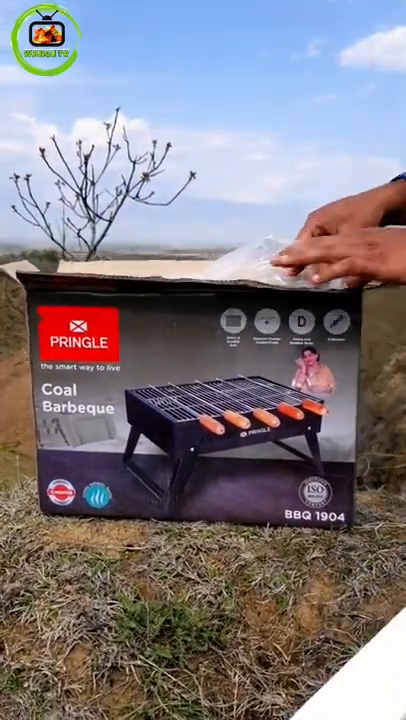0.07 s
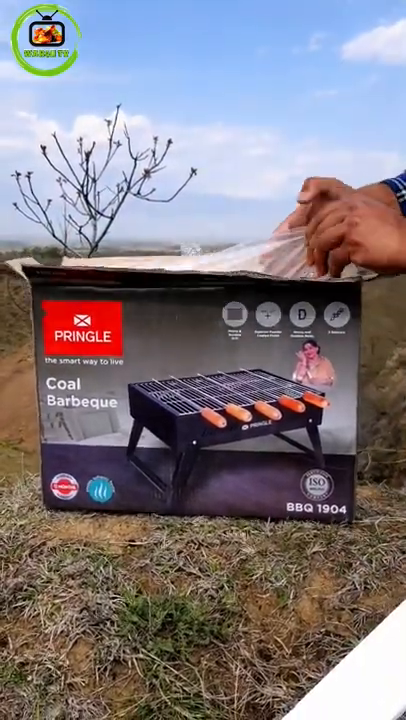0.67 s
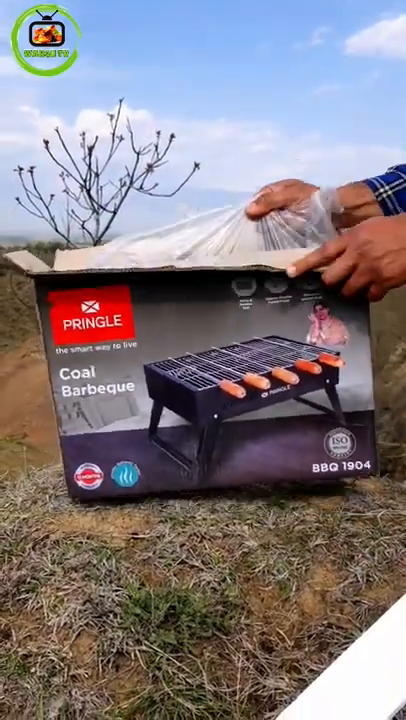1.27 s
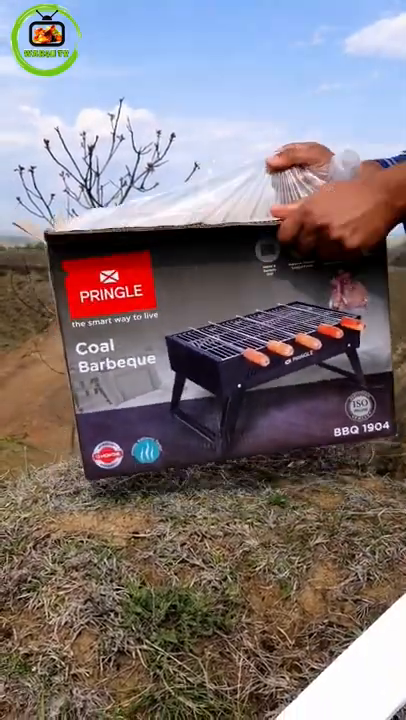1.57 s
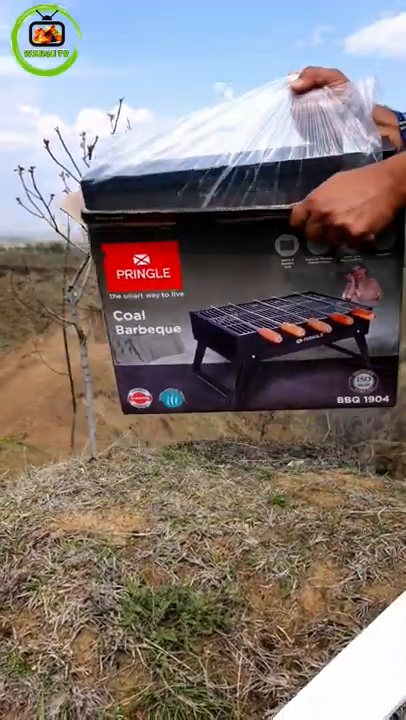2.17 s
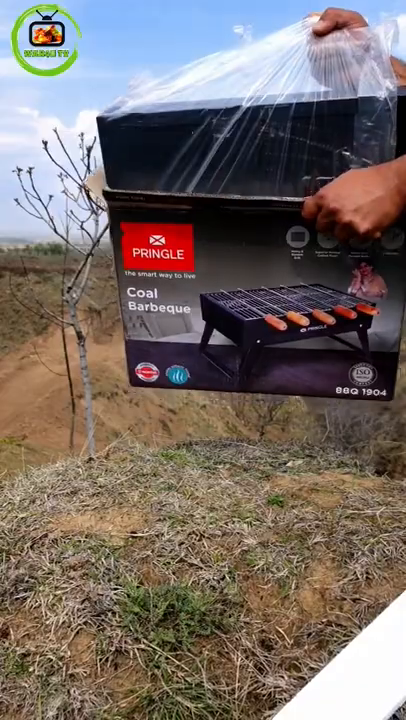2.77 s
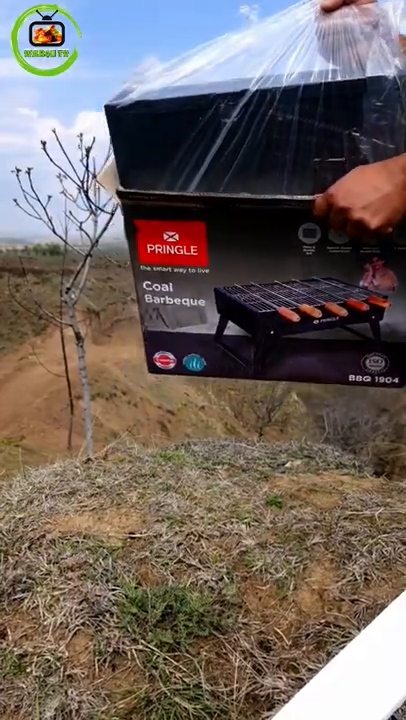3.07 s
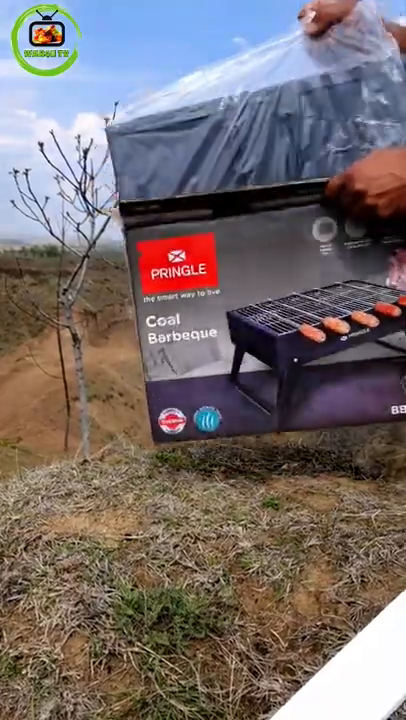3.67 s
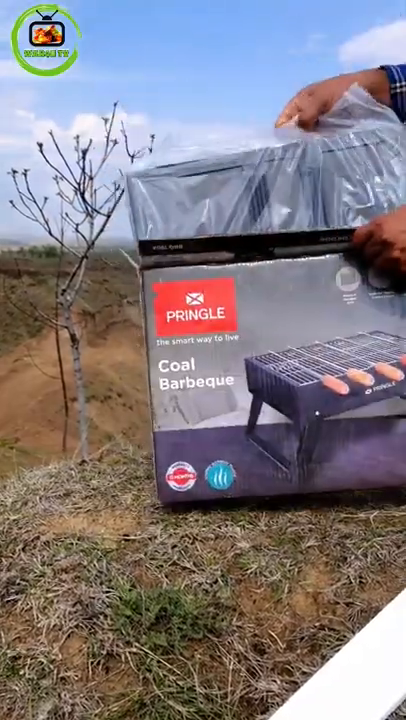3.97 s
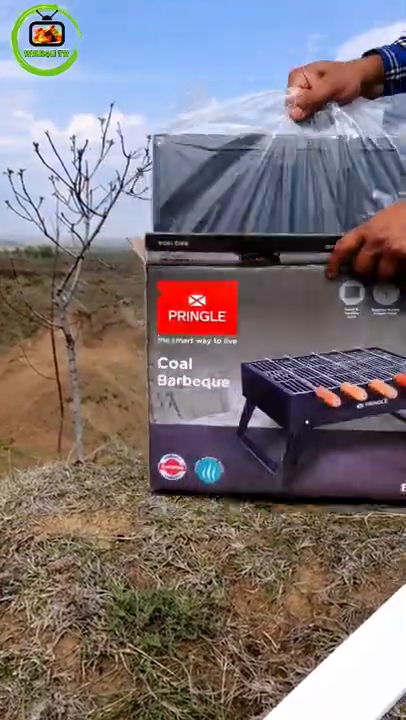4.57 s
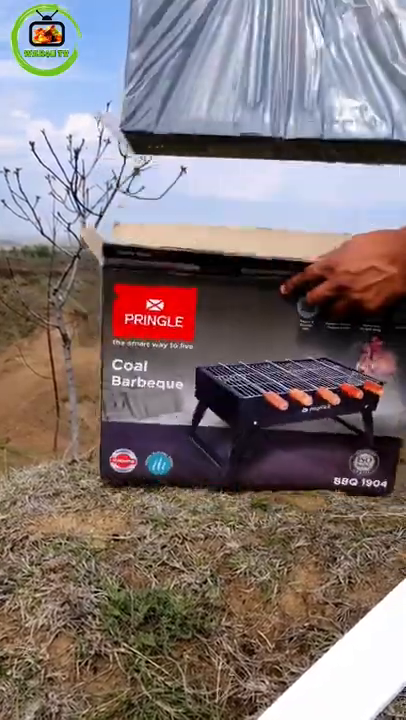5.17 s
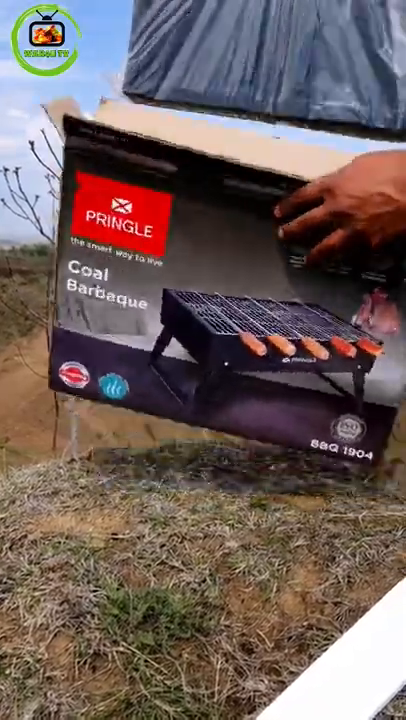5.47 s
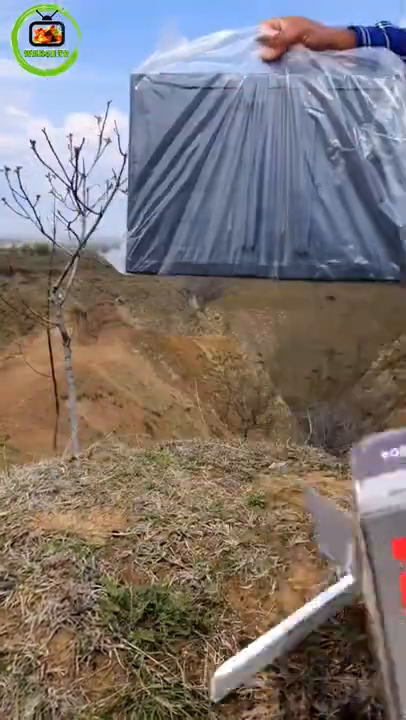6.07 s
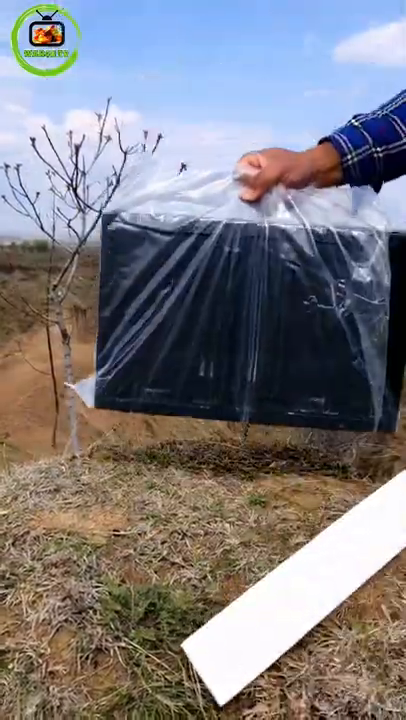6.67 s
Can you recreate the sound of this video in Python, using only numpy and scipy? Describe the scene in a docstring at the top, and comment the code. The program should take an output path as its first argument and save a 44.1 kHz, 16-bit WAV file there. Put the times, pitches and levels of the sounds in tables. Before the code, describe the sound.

From the start, thin plastic wrap crinkles and snaps close by, slightly left, while a folded grill rasps against its cardboard box in uneven tugs. A sharp snap comes at 0.8 seconds and a dull knock at 1.1. Light wind buffets the microphone in low puffs, mostly on the right, until about 1.6 seconds. The scraping and rustling continue, fading to faint hiss and ticks around 3 to 3.6 seconds. At 4 seconds the box thumps and wind rumbles on the left. Louder crinkling and hollow scraping follow, peaking near 4.6, with a heavy knock and deep thumps from 5 to 5.4 as the grill comes free. After a quieter rustle, the empty box hits the ground with two loud hollow thuds at about 6.4 and 6.5 seconds, then smaller knocks, scraping and crinkling fade. The open air behind is very faint, with no echo.

```python
"""Unboxing a grill outdoors

A folded grill in thin plastic wrap is tugged out of its cardboard box. The film crinkles and snaps
as its creases buckle, the load scrapes and knocks along the walls, and the empty box is dropped on
dry ground. A light wind buffets the microphone's two openings (ports), mostly one at a time."""
import sys
import numpy as np
from scipy import signal
from scipy.fft import rfft, irfft
from scipy.io import wavfile
from scipy.ndimage import uniform_filter1d

SR = 44100
rng = np.random.default_rng(int(sys.argv[2]) if len(sys.argv) > 2 else 0)


def pcm_store(signal):
    """Save signal as 16-bit PCM."""
    levels = np.round(np.clip(np.atleast_2d(signal), -1, 1) * 32767)
    wavfile.write(sys.argv[1], SR, levels.astype(np.int16).T)


N = 305613
TIME = np.arange(N) / SR

# The deep tone of both the wind and the shuddering box. Each row: frequency in Hz, level in dB.
BASS_SPECTRUM = [(15, -83), (28, -6), (38, -7), (55, 5.5), (72, 6.5), (100, -0.5), (150, -8.5),
                 (250, -23.5), (400, -31), (700, -57)]
# How the walls ring with the grill inside. Each row: pitch in Hz, width in Hz, level in dB.
LOADED_WALL_MODES = [(217, 100, -7), (319.2, 40, 0.5), (405, 140, -3.5), (523, 90, 0.5), (597, 38, -5.5)]


def from_db(db):
    """Turn decibels into a number to multiply a sound by."""
    return 10 ** (np.asarray(db) / 20)


def rms_one(x):
    """Scale a sound so that its average level (rms) is 1."""
    return x / np.sqrt(np.mean(x ** 2) + 1e-20)


def in_time(rows):
    """Draw straight lines between timed rows, giving each column a value at every sample."""
    times, *columns = np.transpose(rows)
    return [np.interp(TIME, times, column) for column in columns]


def panned(pan_db):
    """Left and right gains that average 1; a positive pan_db leans left."""
    ratio = from_db(np.atleast_1d(pan_db))
    return 2 * np.array([ratio, np.ones_like(ratio)]) / (1 + ratio)


def from_left(x, delay=8):
    """Sound from the box reaches the right port a few samples late."""
    return np.array([x[0], np.pad(x[1], (delay, 0))[:N]])


def add(out, start_s, sound):
    """Mix a short sound into the stereo track."""
    at = int(np.clip(start_s * SR, 0, N - 1))
    out[:, at:at + sound.shape[-1]] += sound[..., :N - at]


def band(x, low_hz, high_hz):
    """Keep what lies between two frequencies and gently fade the rest."""
    edges_hz = [low_hz, min(high_hz, SR / 2 - 100)]
    return signal.sosfilt(signal.butter(2, edges_hz, "band", fs=SR, output="sos"), x)


def coloured(x, spectrum, size=8192):
    """Give a sound the tone of a spectrum; white noise keeps its power."""
    hz, db = np.transpose(spectrum)
    grid_hz = np.maximum(np.arange(size // 2 + 1) * SR / size, 1)
    gains = from_db(np.interp(np.log(grid_hz), np.log(hz), db))
    # a minimum-phase filter: nothing rings ahead of a click
    cepstrum = irfft(np.log(gains))
    response = irfft(np.exp(2 * rfft(cepstrum[:size // 2], size)))[:size // 2]
    return signal.oaconvolve(x, response[None] / np.linalg.norm(response))[:, :N]


def resonant(x, modes):
    """Make a sound ring at several pitches (modes), each at its own level."""
    out = 0
    for k, (hz, width_hz, db) in enumerate(modes):
        r = np.exp(-np.pi * width_hz / SR)
        mode = signal.lfilter([1, 0, -1], [1, -2 * r * np.cos(2 * np.pi * hz / SR), r * r], x)
        out = out + (-1) ** k * from_db(db) * rms_one(mode)
    return out


def drift(per_s):
    """A curve that wanders around 0, reaching a new random value per_s times a second."""
    points = rng.standard_normal(N // 10)
    return np.interp(TIME * per_s, np.arange(len(points)), points)


def stereo_noise(alike, size):
    """White noise whose two sides are unrelated (alike = 0) or nearly the same (close to 1)."""
    mid, side = rng.standard_normal((2, size))
    return np.sqrt(1 + alike) * mid + np.sqrt(1 - alike) * side * np.array([[1], [-1]])


def evened(x, window_s):
    """Hold the slow level at 1 and keep the fine grain."""
    width = max(int(window_s * SR), 2)
    power = uniform_filter1d(uniform_filter1d(x.mean(axis=0) ** 2, width), width)
    return x / np.sqrt(np.abs(power) + 1e-12)


def crackle(per_s, spread_db, ring_s, alike, low_hz, high_hz, count=48, size=512):
    """Random clicks of unequal strength, each on one of many small patches with its own pitch."""
    strengths = from_db(spread_db * np.minimum(rng.exponential(1, N), 4.5)) * rng.choice([-1, 1], N)
    patch_at = rng.integers(0, count, N)
    patches = []
    for hz in np.linspace(low_hz, high_hz, count):
        tick = stereo_noise(alike, size) * np.exp(-TIME[:size] / ring_s)
        ring = band(tick, .78 * hz, 1.28 * hz)
        patches.append(rms_one(.5 * rms_one(tick) + rms_one(ring)))
    out = np.zeros((2, N + size))
    for at in np.flatnonzero(rng.random(N) < per_s / SR):
        out[:, at:at + size] += strengths[at] * patches[patch_at[at]]
    return out[:, :N]


def burst(low_hz, high_hz, decay_s, alike, size=8192):
    """A blow rings many close pitches at once: a band of noise that dies away."""
    t = TIME[:size]
    noise = evened(band(stereo_noise(alike, size), low_hz, high_hz), window_s=0.013)
    return noise * np.exp(-t / decay_s) * (1 - np.exp(-t * high_hz))


def low_swing(hz, swell_s, size=8192):
    """A low wave that swells and dies within a few cycles."""
    age = TIME[:size] / swell_s
    return (age * np.exp(1 - age)) ** 2 * np.sin(2 * np.pi * hz * TIME[:size])


def still_air():
    """The faint, steady hush of the open air."""
    # Its tone. Each row: frequency in Hz, level in dB.
    spectrum = [(59, -30), (100, 4), (189, -27), (634, -12.5), (801, -52), (1150, -17), (2000, -25),
                (7610, -23.5), (14700, -26.5), (16000, -50.5)]
    return from_db(-75) * rms_one(coloured(stereo_noise(0.09, N), spectrum))


def wind():
    """Churning air rumbles on the ports in lumps, and single strong swirls hit one port."""
    # The wind's strength. Each row: time in seconds, left level in dB, right level in dB.
    strength = [(0.0, -26, -25), (0.12, -41, -31), (0.4, -39, -40.5), (0.65, -44, -27), (1.2, -50, -29.5),
                (1.58, -59, -33), (1.9, -55, -43.5), (2.28, -72, -42), (2.42, -67, -58), (2.7, -69, -48),
                (2.8, -58, -31), (2.95, -76, -66.5), (3.6, -65, -61), (3.85, -42, -58), (3.92, -33.5, -55),
                (4.23, -25, -65), (4.36, -52, -41.5), (4.92, -67, -63), (5.01, -27, -26), (5.28, -69, -61),
                (5.36, -44, -36), (5.75, -75, -57), (5.9, -69, -42), (6.12, -74, -59.5), (6.27, -70, -37),
                (6.6, -59, -48), (6.93, -71, -59)]
    # Swirls of air. Each row: start in seconds, level in dB, pitch in Hz, swell in seconds,
    # port (0 left, 1 right).
    swirls = [(0.06, -16.5, 69.4, 0.016, 1), (0.216, -16, 65.4, 0.01, 1), (0.552, -17.5, 78, 0.0088, 1),
              (0.861, -15.5, 79, 0.0054, 1), (0.885, -10, 89, 0.0044, 1), (1.042, -4, 96, 0.0061, 1),
              (1.132, -16, 85, 0.011, 1), (1.211, -16, 130, 0.0033, 1), (1.535, -14, 79, 0.0068, 1),
              (1.564, -14.5, 70, 0.007, 1), (2.56, -22.5, 90.8, 0.0083, 1), (3.899, -15, 94, 0.018, 0),
              (3.937, -12.5, 63, 0.018, 0), (4.137, -10, 78.5, 0.0099, 0), (4.174, -10.5, 74.3, 0.017, 0),
              (4.217, -10.5, 84.5, 0.0084, 0), (5.536, -25, 124, 0.0049, 1), (5.947, -25.5, 64, 0.0092, 1)]
    gust_db, shelter_db = 2, 56  # a swirl is shelter_db weaker at the other port
    ports_db = np.array(in_time(strength)) + gust_db * drift(per_s=16)
    churn = evened(coloured(stereo_noise(0.5, N), BASS_SPECTRUM), window_s=0.037)
    out = churn * from_db(ports_db - 2.5)
    for start_s, db, hz, swell_s, port in swirls:
        pan_db = -shelter_db if port == 1 else shelter_db
        add(out, start_s, from_db(db) * low_swing(hz, swell_s) * panned(pan_db) / 2)
    return out


def effort():
    """Each pull swells and fades; together they set the levels of film, rim and walls in dB."""
    # Pulls and shoves. Each row: time of greatest effort, swell and fade, all in seconds,
    # then the levels of film, rim and walls in dB.
    pulls = [(0.207, 0.12, 0.076, -46.5, -51, -52), (0.317, 0.0072, 0.038, -45.5, -50.5, -53),
             (0.478, 0.068, 0.19, -42.5, -47.5, -58.0), (0.624, 0.15, 0.039, -43, -44.5, -48),
             (0.792, 0.12, 0.15, -41.5, -44.5, -44), (1.062, 0.096, 0.073, -39, -41, -40.5),
             (1.219, 0.059, 0.41, -53, -52.5, -54.5), (1.547, 0.088, 0.012, -41.5, -45.5, -52),
             (1.681, 0.044, 0.064, -45.5, -47.5, -50.0), (1.965, 0.28, 0.1, -51, -52.0, -51),
             (2.217, 0.27, 0.35, -53.5, -53.5, -46), (2.597, 0.091, 0.011, -57, -55.5, -48),
             (2.813, 0.24, 0.1, -58.0, -57, -52.0), (3.145, 0.062, 0.08, -57.5, -59.5, -57),
             (3.393, 0.049, 0.12, -68.5, -69, -64), (3.635, 0.045, 0.055, -59, -63, -59.5),
             (3.742, 0.04, 0.57, -52, -60.5, -60.5), (4.038, 0.1, 0.043, -40.5, -47, -37),
             (4.133, 0.038, 0.13, -44.0, -52.5, -46.5), (4.434, 0.023, 0.12, -39, -41.5, -38.5),
             (4.614, 0.07, 0.021, -32.5, -38.5, -43), (4.762, 0.23, 0.081, -41.5, -43.5, -37.0),
             (5.066, 0.15, 0.14, -46.0, -48.5, -37), (5.266, 0.034, 0.025, -54.5, -63.0, -56),
             (5.454, 0.19, 0.099, -56, -58.5, -50), (5.686, 0.016, 0.063, -59.5, -71, -64.5),
             (5.894, 0.036, 0.069, -57.5, -71.0, -52), (6.205, 0.087, 0.017, -61, -71, -67),
             (6.303, 0.033, 0.059, -52.5, -68.5, -73), (6.384, 0.0053, 0.025, -39.5, -40, -34.5),
             (6.489, 0.04, 0.052, -41.0, -39, -31.5), (6.675, 0.201, 0.07, -51, -51.5, -44.5)]
    roundness = 1.39  # 1 gives a pointed peak, 2 a bell shape
    power = 1e-10
    for peak_s, swell_s, fade_s, *levels_db in pulls:
        from_peak = np.where(TIME < peak_s, (peak_s - TIME) / swell_s, (TIME - peak_s) / fade_s)
        envelope = np.exp(-2 * np.minimum(from_peak ** roundness, 20))
        power = power + from_db(levels_db)[:, None] ** 2 * envelope
    return 10 * np.log10(power)


def film(level_db):
    """Sliding film hisses, and creases buckle in clumps, more of them the harder it is worked."""
    # Gripped film crumples; stretched or loose film only slides.
    # Each row: time in seconds, level of the creases over the rubbing in dB.
    crumpling = [(0, 2), (.45, -1), (.8, 1), (1.25, 3), (1.7, -1), (2.2, -2), (2.35, -7), (2.8, -5),
                 (3.15, -4), (3.7, 1), (4.6, 1), (5.4, 1), (5.8, -6), (6.35, -7), (6.6, -1)]
    # The film's tone. Each row: frequency in Hz, level in dB.
    spectrum = [(880, -17.5), (1500, 0.5), (1870, 0), (2120, -4), (2320, 1.5), (3120, 1.5), (3350, 2),
                (4160, -3), (4730, 0.5), (6180, -3), (7460, 0.5), (9950, -9), (11300, -0.5), (14900, -4.5),
                (16000, -38)]
    # The highest treble. Each row: time in seconds, level compared with the crinkle in dB.
    sparkle_levels = [(0, 1), (0.22, -9), (0.5, -5), (1.25, -6), (1.6, -3), (2.3, -4), (3.9, -7),
                      (4.55, -5), (4.69, 0), (4.8, -5), (5.9, -5.5), (6.2, 1.5), (6.33, 1), (6.45, -6),
                      (6.93, -6)]
    crumpling_db, = in_time(crumpling)
    sparkle_db, = in_time(sparkle_levels)
    clumps_db = 5.0 * drift(per_s=55) + 2.5 * drift(per_s=160)
    creases_per_s = 800 * from_db(.5 * (level_db + 50) + clumps_db)
    creases = crackle(creases_per_s, spread_db=3.5, ring_s=.0005, alike=.25, low_hz=1500, high_hz=15000)
    creases = evened(creases, window_s=.1) * from_db(crumpling_db)
    # crumpling film slides in jerks, stretched film evenly
    jerkiness = .4 * np.minimum(from_db(crumpling_db), 1.5)
    rubbing = stereo_noise(.15, N) * from_db(jerkiness * clumps_db - 1)
    sound = coloured(creases + rubbing, spectrum)
    crinkle = evened(band(sound, 700, 9500), window_s=.08)
    sparkle = evened(band(band(sound, 9500, 18000), 9500, 18000), window_s=.08)
    return from_left(crinkle + sparkle * from_db(sparkle_db)) * from_db(level_db - 4.12) * panned(3.3)


def small_snaps(film_db, per_s=7.0, count=200):
    """Small creases let go at random, following the film's level; returns rows for snaps()."""
    times = np.cumsum(rng.exponential(1, count)) / per_s
    rows = []
    for start_s, (loud, side, pitch) in zip(times, rng.standard_normal((count, 3))):
        if start_s < TIME[-1]:
            db = film_db[int(start_s * SR)] + 10.5 + 3.0 * loud
            hz = 4500 * 2 ** np.tanh(pitch / 2)
            rows.append((start_s, db, side - 9, hz))
    return rows


def snaps(film_db, size=2048):
    """A crease strains briefly, pops near its own pitch, and the sheet shivers after it."""
    # Big creases. Each row: time in seconds, level in dB, lean to the left in steps of 0.4 dB,
    # pitch in Hz.
    big_snaps = [(0.0993, -29, 10, 7400), (0.2032, -42, 27, 3170), (0.2738, -33.5, 2, 2720),
                 (0.3528, -41, 7, 7310), (0.7735, -25, 16, 5360), (0.794, -17.5, 4, 9500),
                 (1.14, -43, 10, 3770), (1.3488, -34, 19, 4840), (1.4232, -35, 4, 8200),
                 (1.5473, -25, -4, 5860), (1.905, -28, -2, 7200), (1.987, -28.5, 7, 5100),
                 (2.094, -36, -2, 7000), (2.159, -27.5, -2, 4900), (2.1867, -27.5, 11, 5900),
                 (2.1994, -34.5, 3, 5150), (2.226, -35, 1, 4830), (2.534, -37.5, 5, 5100),
                 (2.5984, -38.5, 5.5, 6800), (2.9043, -45.5, 11, 2980), (3.0029, -48, 15, 3720),
                 (3.222, -41, 8, 7850), (3.3931, -39.5, 7, 3640), (3.636, -38.5, 0, 8200),
                 (3.722, -37, 10, 4500), (3.868, -37, 3.5, 4540), (3.9733, -33.5, 3, 4700),
                 (4.071, -23.5, 7, 2570), (4.4074, -32, 2.5, 5610), (4.4883, -25, 6, 4840),
                 (4.575, -19, 13, 5820), (4.6244, -36, -1, 4860), (4.6948, -26, 0, 5150),
                 (4.7495, -29, -3, 5030), (5.0603, -23.5, 5, 3300), (5.2759, -37, -3, 7200),
                 (5.3332, -32.5, -1, 2530), (5.4374, -35, 8, 3900), (5.4974, -42.5, -3, 3980),
                 (5.6005, -41.5, 11, 7900), (6.3733, -29, -11, 3200), (6.4767, -23.5, 27, 5040),
                 (6.603, -35.5, 2, 4700)]
    # The tone all snaps share. Each row: frequency in Hz, level in dB.
    spectrum = [(500, -15.5), (1200, -5.5), (2200, -9), (3300, -3), (4900, -2), (6100, -5.5), (7400, 2.5),
                (9800, -11.5), (11500, -8.5), (15000, -8.5), (17000, -22)]
    strain_s = .006
    out, t = np.zeros((2, N)), TIME[:size] - strain_s
    pop_envelope = (t > 0) * np.exp(-np.abs(t) / .0007)
    shiver_envelope = from_db(-15) * np.exp(-np.abs(t) / np.where(t > 0, .006, .0025))
    for time_s, db, lean, hz in list(big_snaps) + small_snaps(film_db):
        pop = np.sign(stereo_noise(0.54, size)) * (pop_envelope + shiver_envelope)
        pop = rms_one(pop + .8 * band(pop, .7 * hz, 1.4 * hz))
        add(out, time_s + .001 - strain_s, pop * from_db(db - 20.5) * panned(0.4 * lean))
    return from_left(coloured(out, spectrum))


def scrape(rim_db, walls_db):
    """The load sticks and slips on cardboard: a dry rasp at the rim, a hollow tone from the walls."""
    # How far the grill is out of the box. Each row: time in seconds, share from 0 to 1.
    pulled_out = [(0, 0.06), (4.3, 0.18), (4.8, 0.2), (5.2, 0.58), (6.93, 0.43)]
    # How the rubbed rim rings, and the walls once the grill has left them.
    # Each row: pitch in Hz, width in Hz, level in dB.
    rim_modes = [(942, 180, -0.5), (1215, 170, -10.5), (1683, 420, -4.5)]
    empty_wall_modes = [(184, 66, -7.5), (324, 27, -2.5), (452, 43, -4.5), (544.3, 38, 0.5), (667, 60, 1)]
    # The broad tone of the rim and of the walls. Each row: frequency in Hz, level in dB.
    rasp_spectrum = [(400, -6.5), (700, -8.5), (1000, -8), (1300, -6.5), (1750, -9), (2300, -20.5),
                     (4000, -34.5)]
    hollow_spectrum = [(110, -13.5), (200, -19), (320, -2), (420, -10), (520, 8.5), (700, 7), (1200, -41)]
    free, = in_time(pulled_out)
    slips_per_s = 700 * from_db(4.5 * drift(per_s=70))
    rim = crackle(slips_per_s, spread_db=0.5, ring_s=0.0034, alike=0.77, low_hz=656, high_hz=2110)
    walls = crackle(slips_per_s, spread_db=3.0, ring_s=0.0023, alike=0.91, low_hz=226, high_hz=745)
    # the rim only sings while the grill presses on it
    rasp = resonant(rim, rim_modes) * (1 - free) + from_db(4.5) * rms_one(coloured(rim, rasp_spectrum))
    rasp = from_left(evened(rasp, window_s=0.094), delay=7) * from_db(rim_db - 0.5)
    hollow = (resonant(walls, LOADED_WALL_MODES) * np.sqrt(1 - free)
              + resonant(walls, empty_wall_modes) * np.sqrt(free)
              + from_db(-0.5) * rms_one(coloured(walls, hollow_spectrum)))
    hollow = evened(hollow, window_s=0.14) * from_db(walls_db - 3.5)
    return rasp * panned(-2.0) + hollow * panned(-0.26)


def rumble(walls_db):
    """The whole box shudders in the bass as the load drags along it."""
    shudder = evened(coloured(stereo_noise(0.85, N), BASS_SPECTRUM), window_s=0.043)
    return shudder * from_db(walls_db - 3)


def flicks():
    """Fingers flick the stretched film, which gives a lower, drum-like tick."""
    # Each row: start in seconds, level in dB, pitch in Hz.
    finger_flicks = [(0.311, -32.5, 1260), (2.906, -35, 1160), (3.005, -37.5, 1160), (3.225, -40, 1180),
                     (3.395, -38, 1360), (3.975, -26, 1690), (5.6, -37, 2440)]
    out = np.zeros((2, N))
    for start_s, db, hz in finger_flicks:
        add(out, start_s, from_db(db - 11.5) * burst(0.79 * hz, 1.37 * hz, decay_s=0.0041, alike=0.52))
    return from_left(out)


def knocks(size=8192):
    """Knocked cardboard gives a hard strike, a clack, a body and a boom; it rings longer once empty."""
    # Each row: start in seconds, then the levels of body, boom and clack in dB.
    blows = [(0.776, -45, -31.5, -33), (1.089, -34, -24, -31.5), (1.213, -61, -34, -59),
             (1.283, -53, -46, -60), (1.901, -38, -39.5, -43), (2.224, -33, -43, -47),
             (3.393, -69, -58, -53), (3.899, -37, -27, -45), (3.977, -49, -23.5, -34.5),
             (4.002, -26.5, -39, -31.5), (4.603, -27, -34, -37), (4.719, -34, -35, -53),
             (4.752, -33.5, -42, -38), (4.779, -38, -31.5, -37), (4.974, -32, -41, -35),
             (5.012, -49, -23, -41), (5.059, -17.5, -24.5, -46), (5.331, -34.5, -44, -42),
             (5.372, -36.5, -58, -46), (5.412, -45, -57, -39.5), (5.448, -38.5, -46, -49),
             (5.495, -36.5, -60, -39.5), (6.136, -36.5, -56, -56.5), (6.376, -18, -16.5, -29),
             (6.394, -32, -26, -31), (6.479, -16, -18.5, -31), (6.502, -27, -38, -31.5),
             (6.605, -27.5, -37.5, -38), (6.717, -36, -27, -59)]
    # How the empty box rings. Each row: pitch in Hz, level in dB, seconds to fade by 60 dB.
    box_modes = [(182, 0.5, 0.22), (369, 2.5, 0.18), (553, -21, 0.09), (796, -3, 0.034), (1210, -56, 0.11),
                 (1320, -41, 0.4)]
    empty_from_s, strike_hz, strike_decay_s = 5.2, 430, .003
    out, t = np.zeros((2, N)), TIME[:size]
    empty_ring = sum(from_db(db - 60 * t / fade_s) * np.sin(2 * np.pi * hz * t)
                     for hz, db, fade_s in box_modes)
    loaded_ring = sum(from_db(db) * np.exp(-np.pi * width_hz * t) * np.sin(2 * np.pi * hz * t)
                      for hz, width_hz, db in LOADED_WALL_MODES)
    strike = from_db(-0.5) * np.sin(2 * np.pi * strike_hz * t) * np.exp(-t / strike_decay_s)
    for start_s, body_db, boom_db, clack_db in blows:
        boom = from_db(boom_db) * burst(150, 237, decay_s=0.014, alike=0.81)
        body = from_db(body_db - 8.5) * burst(420, 627, decay_s=0.012, alike=0.73)
        clack = from_db(clack_db - 4.5) * burst(470, 1900, decay_s=0.0082, alike=0.17)
        ring = from_db(-17) * empty_ring if start_s > empty_from_s else from_db(-12.5) * loaded_ring
        add(out, start_s, boom + body + clack + from_db(body_db) * (strike + ring))
    return out * panned(-1.3)


def thumps():
    """The broad walls flex and push air when the load shifts or the box lands."""
    # Each row: start in seconds, level in dB, pitch in Hz, swell in seconds.
    wall_flexes = [(3.987, -14, 68.5, 0.011), (5.058, -21, 94, 0.014), (5.098, -14, 75, 0.011),
                   (5.166, -33.5, 87, 0.024), (5.34, -15, 82, .013), (5.393, -26.5, 81, 0.015),
                   (6.371, -22, 73, 0.016), (6.482, -22.5, 79, .012)]
    out = np.zeros((2, N))
    for start_s, db, hz, swell_s in wall_flexes:
        add(out, start_s, from_db(db) * low_swing(hz, swell_s))
    return out


def scene():
    """Everything is close and in the open, over faint still air."""
    film_db, rim_db, walls_db = effort()
    air = still_air()
    box = scrape(rim_db, walls_db) + rumble(walls_db) + knocks() + thumps()
    return air + wind() + box + film(film_db) + flicks() + snaps(film_db)


def record(dry):
    """The microphone sheds the deepest bass, and the highest treble is cut steeply."""
    low_hz, high_hz = 41, 16000
    thinned = signal.sosfilt(signal.butter(2, low_hz, "high", fs=SR, output="sos"), dry)
    return signal.sosfilt(signal.ellip(10, .2, 80, high_hz, fs=SR, output="sos"), thinned)


dry = scene()
out = record(dry)
pcm_store(out)
```